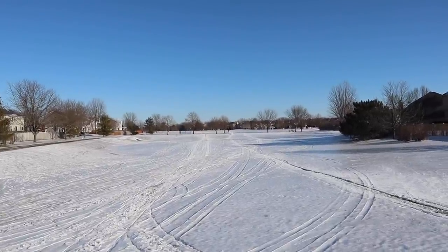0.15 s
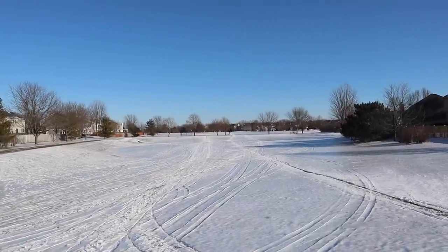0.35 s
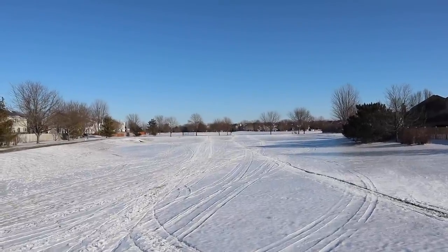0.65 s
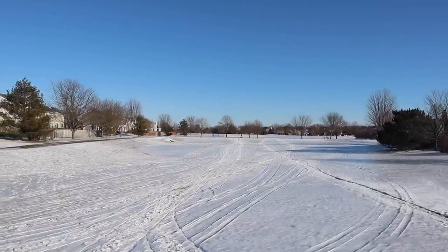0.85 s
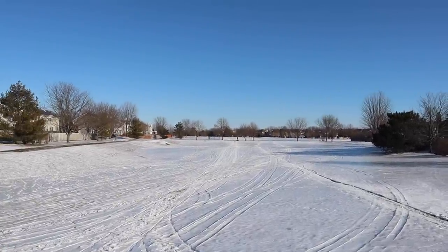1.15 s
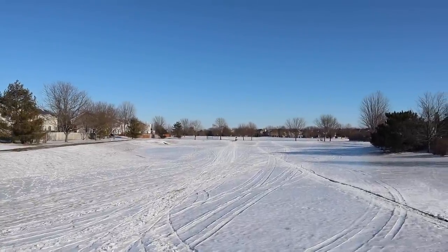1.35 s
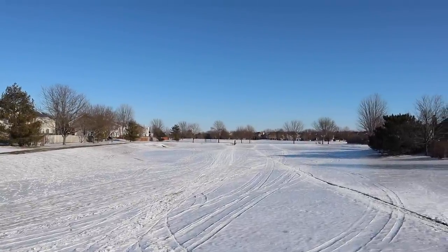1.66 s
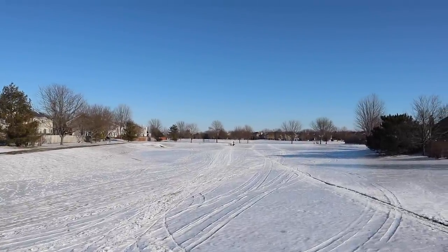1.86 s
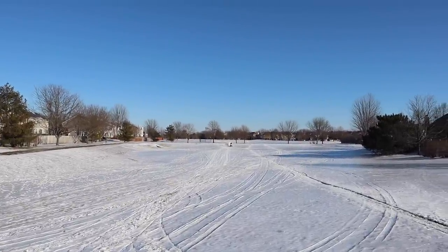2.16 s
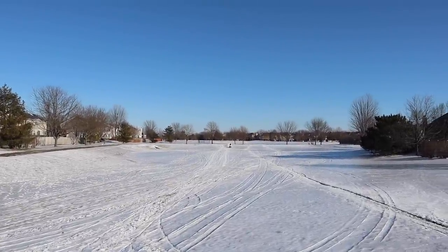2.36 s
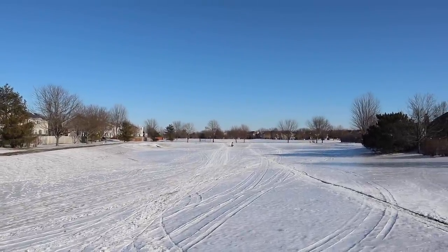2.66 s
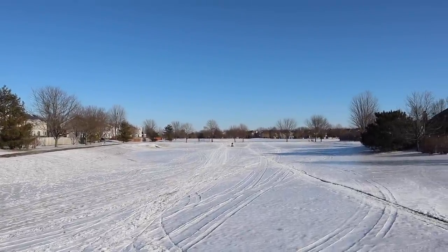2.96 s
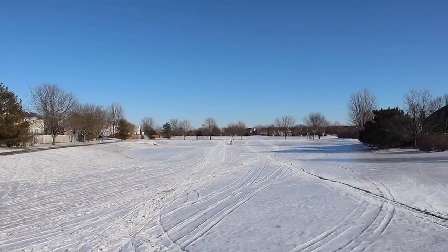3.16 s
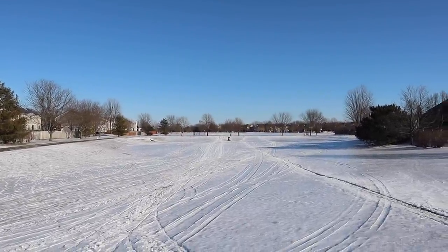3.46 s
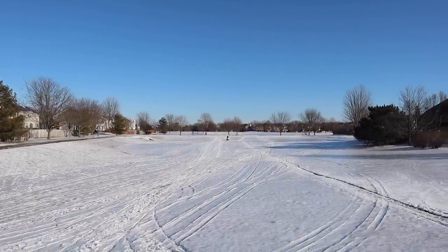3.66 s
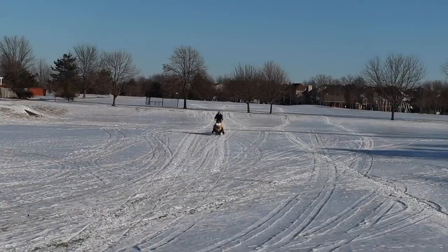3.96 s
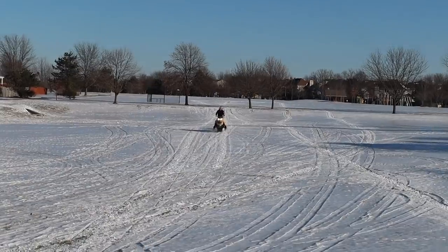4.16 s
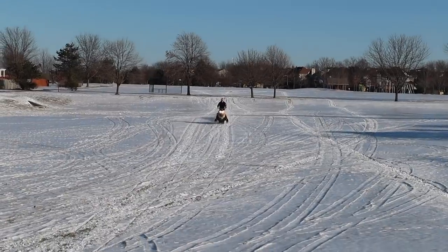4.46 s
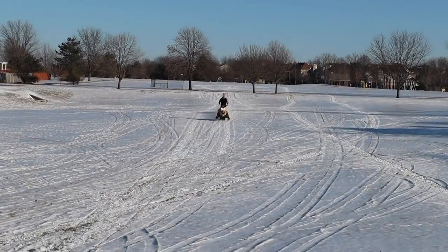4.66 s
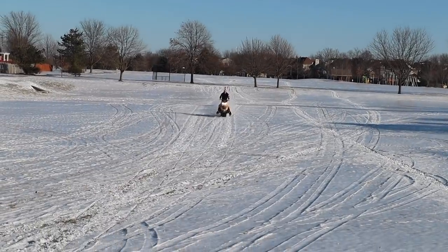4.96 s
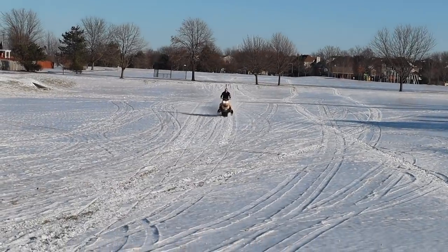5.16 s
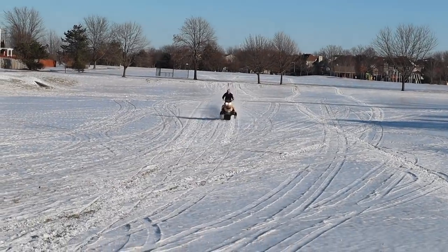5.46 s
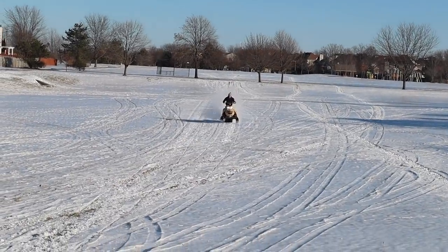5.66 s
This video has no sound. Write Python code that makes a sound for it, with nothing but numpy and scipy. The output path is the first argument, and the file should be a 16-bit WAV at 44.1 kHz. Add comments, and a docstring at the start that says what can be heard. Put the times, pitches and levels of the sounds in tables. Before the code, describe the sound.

A two-stroke snowmobile revs four times far out on an open snowy field. Each rev swells, climbs in pitch and echoes off houses and trees. The first is fainter, the next two are short and loud, and the last is held at a steady high speed with a track whine and light hisses of snow. Wind buffets the microphone over a quiet hush, and the sound jumps twice with a click.

```python
"""A two-stroke snowmobile revs four times far out on a snowy field; two hard cuts break the sound.
Each time the engine grows louder and climbs in pitch until the clutch holds its speed.
Its exhaust pulses ring the pipe, flutter through moving air and echo from houses and tree lines.
In the last, long run the track sprays snow and the belt and track whine.
Wind buffets the microphone over a quiet hush, soft rustles and a brief faraway drone."""
import sys
import numpy as np
from scipy import signal
from scipy.fft import rfft, irfft, next_fast_len
from scipy.io import wavfile
from scipy.ndimage import uniform_filter1d, map_coordinates

SR = 44100
rng = np.random.default_rng(int(sys.argv[2]) if len(sys.argv) > 2 else 0)


def put_to_file(sound):
    """Save the sound as 16-bit audio at rate SR, in the file named by the first command-line argument."""
    columns = np.atleast_2d(sound).T  # one column per channel
    safe = np.clip(columns, -1, 1)
    whole_steps = np.round(safe * 32767)
    wavfile.write(sys.argv[1], SR, whole_steps.astype(np.int16))


N = 255471
T = np.arange(N) / SR
CRUISE_HZ = 280  # firings a second near full speed

# The exhaust has four bands, from low to high: boom, bark, snarl and rasp.
# each pull of the throttle: (open [s], shut [s], first firing rate [Hz], climb [Hz/s], swell time [s],
# swell size [dB], boom [dB], bark [dB], snarl [dB], rasp [dB])
THROTTLE_PULLS = [(-.12, 0.863, 193.7, 245.9, 0.26, 13.5, -39.5, -32.5, -32, -39),
                  (1.48, 1.9, 145.9, 327.6, 0.27, 53, -19.5, -17.5, -17.5, -23.5),
                  (2.368, 3.037, 145.9, 368, .37, 32, -25.5, -22, -21.5, -28.5),
                  (3.9, 5.724, 109.9, 400.7, 0.24, 33.5, -28, -15.5, -19, -29)]
# one value for each band, boom to rasp:
BAND_SWELL = [.35, .65, 1, 1.05]  # how much of the swell it takes (share [ratio])
EASE_OFF = [-6, -10.5, -13.5, -19.5]  # as the rider eases off (level change [dB])
APPROACH = [-2, -4, 0.26, 1]  # the sled brightens as it comes closer (level change [dB/s])
# speed the clutch holds, in the short pulls and the long run: (time [s], firing rate [Hz])
HELD_SHORT = [(.24, 265), (.35, 269), (.5, 264), (.62, 274), (.89, 281), (1.9, 292), (2.85, 286),
              (2.93, 290), (3.05, 281)]
HELD_LONG = [(4.35, 280.3), (4.518, 282.5), (4.648, 278.9), (4.764, 280.3), (4.818, 277.4), (5.21, 283.9),
             (5.376, 280.6), (5.714, 285.2), (5.73, 278.8)]
# tone of the exhaust pipe in each pull: (frequency [Hz], level [dB])
PIPE_1 = [(150, 0), (280, -16), (560, -13), (800, 0.5), (1100, -0.5), (1400, -3.5), (1750, -4), (2250, -3),
          (2650, -7), (3100, -8), (3800, -18), (5200, -18), (8000, -35), (12000, -40), (16000, -58)]
PIPE_2 = [(150, 1), (280, -10), (560, 0.5), (850, -2.5), (1250, -3), (1600, -7.5), (2200, -4.5), (2680, -5),
          (3100, -10), (3900, -11), (5200, -11.5), (7800, -26), (9500, -33.5), (12000, -30), (16000, -43)]
PIPE_3 = [(150, -12), (280, -14.5), (560, -1), (850, 3.5), (1130, 3), (1400, -4.5), (1750, -2.5),
          (2250, -2), (2700, -1), (3150, -4.5), (3900, -8), (5200, -6.5), (8500, -26), (12000, -27),
          (16000, -37)]
PIPE_4 = [(150, -24), (280, -13), (560, -13), (850, -7), (1130, -4), (1400, -6.5), (1750, -6.5), (2250, -3),
          (2650, -5), (3100, -11), (3800, -18), (5300, -16), (8000, -34.5), (12000, -37), (16000, -44.5)]
# echoes off houses and tree lines: (delay [s], relative level [dB], pitch drop from motion [ratio])
WALL_ECHOES = [(.05, -15, .004), (.105, -13, .022), (.17, -20, .025), (.22, -23, .03), (.31, -27, .015),
               (.43, -30, .03)]
# how long sound lingers in the trees: (frequency [Hz], time to fade by 60 dB [s])
TREE_FADE = [(200, 3.9), (900, 2.73), (2500, 1.25), (5000, 0.75), (12000, 0.2)]
# tone of the echoes, wind, hush, rustles and flying snow: (frequency [Hz], level [dB])
ECHO_TONE = [(150, -3), (550, -3), (820, 1), (1400, 2), (3000, 1), (6000, -3), (15000, -4.5)]
WIND_TONE = [(12, -4), (25, -7), (48, 3), (95, -4), (160, -11.5), (240, -20.5), (350, -31.5), (600, -40),
             (1500, -59), (4000, -100)]
HUSH_TONE = [(240, -7), (400, -15), (460, -19.5), (496, -5.5), (579, -41), (730, -18), (1290, -21),
             (9180, -48.5), (16000, -72)]
RUSTLE_TONE = [(500, 4), (1500, 11), (3500, 0), (5200, 0.5), (8000, -12), (12500, -16.5), (16000, -25)]
SNOW_TONE = [(2500, -28), (5000, -7), (8000, -13), (12500, -9), (16000, -21)]
# tone of the belt's chirp: (frequency [Hz], level [dB])
CHIRP_TONE = [(2000, -30), (3000, -9), (3300, 11), (3700, -16), (5000, -4), (6500, -61)]
# strength of the breeze: (time [s], level [dB])
BREEZE = [(0, -16.5), (1.0, -26), (1.25, -13.5), (1.55, -25), (1.9, -32), (2.02, -22), (2.2, -25.5),
          (2.4, -18.5), (2.7, -17), (2.87, -20), (3.2, -23), (3.52, -35.5), (3.62, -20), (4.12, -12.5),
          (4.6, -33), (4.76, -25.5), (5.05, -29), (5.55, -31), (5.79, -43)]
# the strongest swirls of air: (time [s], peak level [dB])
SWIRLS = [(.25, -12), (.415, -13.5), (1.164, -14.5), (1.31, -15), (1.407, -8.5), (2.09, -16), (2.243, -12),
          (2.619, -9.5), (2.73, -8.5), (3.335, -15), (4.05, -16.5), (4.85, -18)]
# sudden jumps in the sound: (time [s], click level [dB])
HARD_CUTS = [(.891, -19.5), (3.894, -10.5)]
# soft rustles: (start [s], end [s], level [dB])
RUSTLE_SPANS = [(2.507, 2.518, -34.5), (3.322, 3.377, -37), (3.384, 3.617, -41.5), (3.618, 3.9, -42)]
# snow flung up by the track: (time [s], peak level [dB])
SNOW_SPRAYS = [(4.27, -39.5), (4.85, -41), (5.15, -50), (5.66, -37.5)]
# notes of the belt and track: (frequency [Hz], level [dB])
WHINE_NOTES = [(345, -45), (1238, -31.5), (2470, -44), (3065, -34)]


def amp(db):
    """Turn decibels into a number to multiply by."""
    return 10 ** (np.asarray(db) / 20)


def unit(x):
    """Scale x to an average strength (rms) of 1."""
    return x / np.sqrt(np.mean(x ** 2) + 1e-20)


def steady(x, size=2600):
    """Hold the strength of x near 1 over every stretch of size samples."""
    return x / np.sqrt(np.abs(uniform_filter1d(x ** 2, size)) + 1e-12)


def along(points, hz):
    """Read a (frequency, value) table at hz, with octaves evenly spaced."""
    freqs, values = np.transpose(points)
    return np.interp(np.log(hz + 1), np.log(freqs + 1), values)


def curve(rows, t):
    """Read a (time, value) table at the times t."""
    return np.interp(t, *np.transpose(rows))


def wobble(rate, t):
    """A smooth random curve with rate new values a second."""
    return map_coordinates(rng.standard_normal(4096), [t * rate], mode="wrap")


def gate(t, start, end, edge):
    """1 from start to end, fading over edge seconds on each side."""
    return np.clip((t - start) / edge + 1, 0, 1) * np.clip((end - t) / edge + 1, 0, 1)


def humps(rows, half_width_s):
    """A smooth rise and fall for each (time, level) row."""
    return sum(amp(db) * np.exp(-.5 * ((T - s) / half_width_s) ** 2) for s, db in rows)


def coloured(x, gain):
    """Turn each frequency of x up or down by gain(hz)."""
    size = 2 * next_fast_len(len(x) // 2 + 4096)
    cepstrum = irfft(np.log(np.maximum(gain(np.fft.rfftfreq(size, 1 / SR)), 1e-6)))
    # make the filter ring only after a sound, never before it
    cepstrum[1:size // 2] *= 2
    cepstrum[size // 2 + 1:] = 0
    return irfft(rfft(x, size) * np.exp(rfft(cepstrum)))[:len(x)]


def noise(tone):
    """Noise of strength 1, shaped by a tone table."""
    return unit(coloured(rng.standard_normal(N), lambda hz: amp(along(tone, hz))))


def below(hz, edge_hz):
    """Near 1 below edge_hz, falling steeply above it."""
    return 1 / np.sqrt(1 + (hz / edge_hz) ** 16)


def pulses(at, sizes, count):
    """Sharp pulses that can land between samples."""
    taps = np.floor(at).astype(int)[:, None] + np.arange(-7, 9)
    offset = taps - at[:, None]
    shape = np.sinc(offset) * np.cos(np.pi * offset / 16) ** 2
    return np.bincount(np.clip(taps, 0, count - 1).ravel(), (sizes[:, None] * shape).ravel(), count)


def firing_rate(t, start, first_hz, climb_hz_per_s, softness_hz=9):
    """The engine gains speed steadily, then levels off as the clutch holds it."""
    free = first_hz + climb_hz_per_s * np.maximum(t - start, 0)
    held = curve([*HELD_SHORT, *HELD_LONG], t)
    return held - softness_hz * np.logaddexp(0, (held - free) / softness_hz)


def blunted(x, spread=2.22):
    """Pipe and hood delay each frequency by its own small amount, which blunts the pulses."""
    size = next_fast_len(len(x) + 4096)
    hz = np.fft.rfftfreq(size, 1 / SR)
    return irfft(rfft(x, size) * np.exp(1j * spread * wobble(1 / 450, hz)), size)[:len(x)]


def firings(t, rate, jitter_s=.000005, uneven=0.044, scatter_db=1.38):
    """Each firing gives a bang and a puff of gas; a two-stroke is more ragged at low speed."""
    turns = np.cumsum(rate * (1 + .0012 * wobble(30, t))) / SR
    firing = np.arange(1, int(turns[-1]))
    due = np.interp(firing, turns, np.arange(len(t)))
    ragged = rng.standard_normal((2000, 2))[firing] * (CRUISE_HZ / rate[due.astype(int), None]) ** .5
    sizes = (1 + uneven * (-1) ** firing) * amp(scatter_db * ragged[:, 1])
    bangs = pulses(due + jitter_s * SR * ragged[:, 0], sizes, len(t))
    bangs = steady(blunted(bangs))
    puffs = unit(np.exp(-(turns % 1) / .9) * rng.standard_normal(len(t)))
    return bangs, puffs * (CRUISE_HZ / rate) ** 1.2


def band_levels(t, start, swell_s, swell_db, rate, full_db, boom_db_per_octave):
    """Each band's level in dB: it swells as the throttle opens, treble most, and grows with speed."""
    still_to_swell = np.clip(1 - (t - start) / swell_s, 0, 1) ** 1.387  # fast at first, then creeping
    surge_db = 0.82 * wobble(14, t)
    effort_db = surge_db - swell_db * still_to_swell
    octaves = np.log2(rate / CRUISE_HZ)
    db_per_octave = 4.5 + np.array([boom_db_per_octave, 0, 0, 0])
    return np.array(full_db)[:, None] + np.outer(BAND_SWELL, effort_db) + np.outer(db_per_octave, octaves)


def exhaust(t, pull, pipe, ring, gas, rasp_gas, bounce_db, boom_db_per_octave, change_db=0):
    """One pull of the throttle: bangs and puffs pass through the pipe and out over the snow."""
    start, shut, first_hz, climb, swell_s, swell_db, *full_db = pull
    rate = firing_rate(t, start, first_hz, climb)
    bangs, puffs = firings(t, rate)
    # near full speed the pipe sings at about four times the firing rate
    in_tune = np.clip((rate - 245) / 30, 0, 1)
    bangs = bangs + ring * in_tune * coloured(bangs, lambda hz: 1 / np.hypot(1, (hz - 1130) / 60))
    edges_hz = [20, 700, 1550, 3500, 20000]
    gas_shares = [0, gas / 2, gas, rasp_gas]  # higher bands hold more rushing gas
    levels = band_levels(t, start, swell_s, swell_db, rate, full_db, boom_db_per_octave) + change_db
    voice = 0
    for low, high, share, db in zip(edges_hz, edges_hz[1:], gas_shares, levels):
        band = coloured(bangs + share * puffs,
                        lambda hz: amp(along(pipe, hz)) * below(low, hz + 1) * below(hz, high))
        voice = voice + amp(db) * steady(band)
    return snow_bounce(flutter(voice) * gate(t, start, shut, edge=0.0062), bounce_db)


def flutter(x, depth_db=2.2):
    """Moving air makes patches of the sound swell and fade, the bass least."""
    hz, _, spectrum = signal.stft(x, SR, nperseg=512)
    patches = uniform_filter1d(rng.standard_normal(spectrum.shape), size=5, axis=0)
    patches = unit(uniform_filter1d(patches, size=22, axis=1))
    depth = depth_db * np.minimum(hz / 1600, 1)[:, None]
    return signal.istft(spectrum * amp(depth * patches), nperseg=512)[1][:len(x)]


def snow_bounce(x, level_db, count=6):
    """Mounds of snow send weak copies a little late, along slowly changing paths."""
    n = np.arange(len(x))
    delays_s = [delay + .00012 * wobble(3, n / SR) for delay in rng.uniform(.006, .04, count)]
    copies = sum(map_coordinates(x, [n - delay * SR], order=3) for delay in delays_s)
    return (x + amp(level_db) * copies / np.sqrt(count)) / np.sqrt(1 + amp(level_db) ** 2)


def trees(x):
    """Countless branches scatter the sound into a blur that dies away, treble first."""
    hz, t, spectrum = signal.stft(x, SR, nperseg=1024)
    decay = amp(-120 * t / along(TREE_FADE, hz)[:, None]) * (1 - np.exp(-t / 0.0025))
    decay /= decay.sum(axis=1, keepdims=True)
    energy = signal.fftconvolve(np.abs(spectrum) ** 2, decay, axes=1)[:, :len(t)]
    scramble = signal.stft(rng.standard_normal(len(x)), nperseg=1024)[2]
    return signal.istft(np.sqrt(np.abs(energy)) * scramble / np.std(scramble), nperseg=1024)[1][:len(x)]


def echoes(x, walls_db, trees_db):
    """The field's edges send back echoes, lowered in pitch by the sled's motion; trees add a tail."""
    n = np.arange(len(x))
    centre = np.sum(n * x ** 2) / np.sum(x ** 2)
    answer = amp(trees_db) * trees(x)
    for delay, db, drop in WALL_ECHOES:
        copy = map_coordinates(x, [n - delay * SR - drop * (n - centre)], order=3)
        answer += amp(db + walls_db) * snow_bounce(copy, level_db=-4, count=2)
    return coloured(answer, lambda hz: amp(along(ECHO_TONE, hz)))


def snowmobile():
    """Four pulls of the throttle in three stretches; each cut ends the echoes before it."""
    t1, t2, t3 = np.split(T, [int(s * SR) for s, _ in HARD_CUTS])
    far, near = dict(gas=.4, rasp_gas=1.1), dict(gas=.34, rasp_gas=.85)
    easing = np.outer(EASE_OFF, np.clip((t1 - 0.37) / 0.263, 0, 1))  # from halfway through pull one
    approach = np.outer(APPROACH, np.maximum(t3 - 4.06, 0))
    # the bark flares as the engine comes into tune with the pipe, then settles
    approach[1] += 3.5 * np.exp(-.5 * ((t3 - 4.43) / 0.0933) ** 2)
    first = exhaust(t1, THROTTLE_PULLS[0], PIPE_1, ring=0.2, bounce_db=-6.5,
                    boom_db_per_octave=17, change_db=easing, **far)
    second = exhaust(t2, THROTTLE_PULLS[1], PIPE_2, ring=0.082, bounce_db=-7.5,
                     boom_db_per_octave=17, **near)
    second += exhaust(t2, THROTTLE_PULLS[2], PIPE_3, ring=0.043, bounce_db=-6.5,
                      boom_db_per_octave=8, **far)
    third = exhaust(t3, THROTTLE_PULLS[3], PIPE_4, ring=1.15, bounce_db=-13,
                    boom_db_per_octave=-3, change_db=approach, **near)
    # the nearer the sled, the weaker its echoes beside the direct sound
    first += echoes(first, walls_db=2, trees_db=-8.5)
    second += echoes(second, walls_db=0.5, trees_db=-11.5)
    third += echoes(third, walls_db=-6, trees_db=-13)
    return np.concatenate([first, second, third])


def wind(lumps_db=3):
    """The breeze buffets the microphone in uneven lumps; a strong swirl passes as one thump."""
    breeze = amp(curve(BREEZE, T) + lumps_db * wobble(26, T))
    thumps = humps(SWIRLS, half_width_s=0.013)
    return np.hypot(breeze, thumps) * steady(noise(WIND_TONE), size=4000)


def hush():
    """The steady, distant hush of the open field."""
    return amp(-42) * noise(HUSH_TONE)


def clicks(settle_s=0.0042):
    """The pressure jumps at each cut and settles: a click."""
    return sum(amp(db) * (T >= s) * np.exp(-np.abs(T - s) / settle_s) for s, db in HARD_CUTS)


def drone():
    """A faint, wavering note from far away."""
    hz = 455 * (1 + 0.0192 * wobble(19, T))
    return amp(-50) * np.sin(2 * np.pi * np.cumsum(hz) / SR) * gate(T, .92, 1.52, edge=.04)


def chirp():
    """A short, high squeal of the belt as the clutch takes hold in the third pull."""
    return amp(-33) * noise(CHIRP_TONE) * gate(T, 2.481, 2.515, edge=.003)


def rustles():
    """Soft bursts of noise whose level flickers."""
    bursts = sum(amp(db) * gate(T, start, end, edge=0.0033) for start, end, db in RUSTLE_SPANS)
    return bursts * amp(1.3 * wobble(40, T)) * noise(RUSTLE_TONE)


def snow_spray():
    """Loose snow hisses off the track in short sprays."""
    return humps(SNOW_SPRAYS, half_width_s=0.06) * noise(SNOW_TONE)


def whine():
    """Belt and track whine, creeping up in pitch, once the sled runs flat out."""
    speed = 1 + .008 * (T - 5.2) + .004 * wobble(25, T)
    travel = np.cumsum(speed) / SR
    notes = sum(amp(db + 0.63 * wobble(23, T)) * np.sqrt(2) * np.sin(2 * np.pi * hz * travel)
                for hz, db in WHINE_NOTES)
    return notes * gate(T, 4.6, 5.72, edge=.03)


def scene():
    """Everything at one microphone."""
    sled = snowmobile() + whine() + chirp() + snow_spray()
    return (sled + wind() + hush() + drone() + rustles() + clicks())[None]


def record(dry, top_hz=15850):
    """Round off the highest peaks and keep nothing above top_hz."""
    rounded = dry / (1 + np.abs(dry) ** 8) ** (1 / 8)
    size = next_fast_len(N + 8192)
    kept = np.fft.rfftfreq(size, 1 / SR) < top_hz
    return irfft(rfft(rounded, size) * kept, size)[..., :N]


dry = scene()
out = record(dry)
put_to_file(out)
```